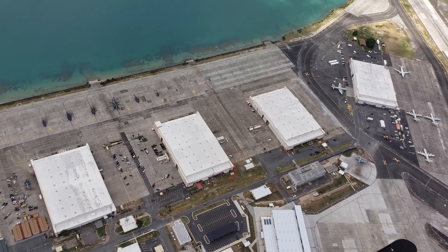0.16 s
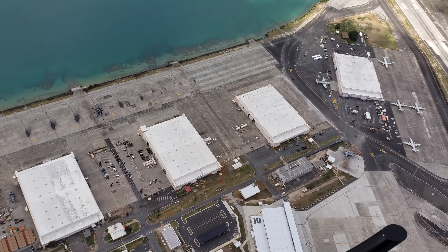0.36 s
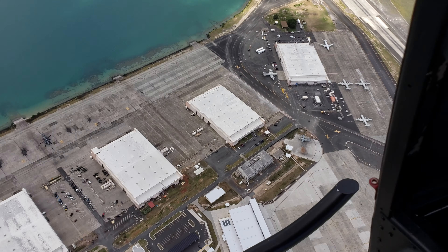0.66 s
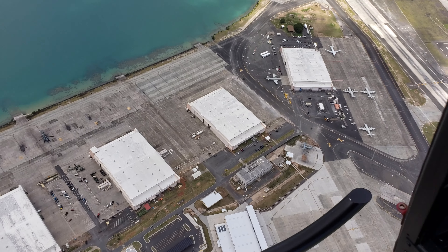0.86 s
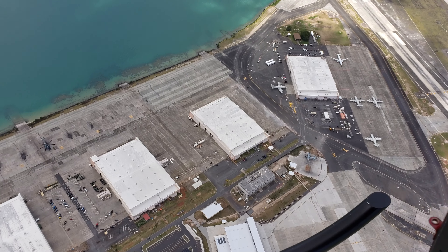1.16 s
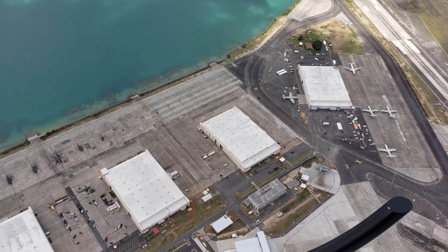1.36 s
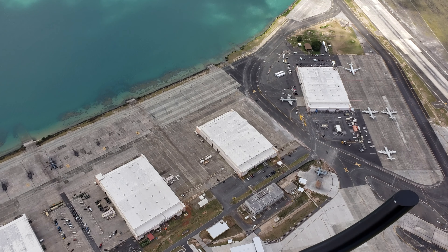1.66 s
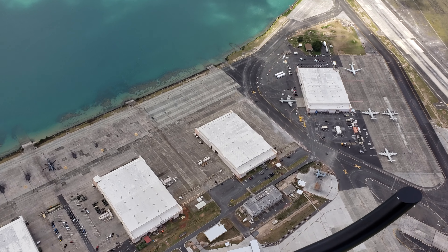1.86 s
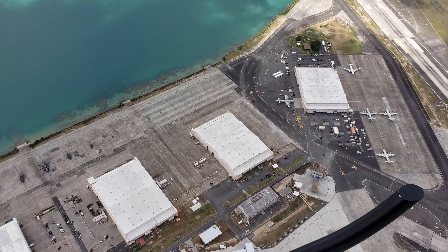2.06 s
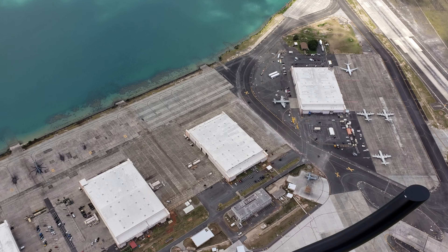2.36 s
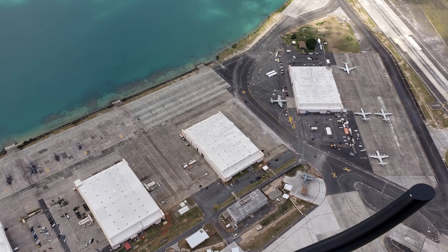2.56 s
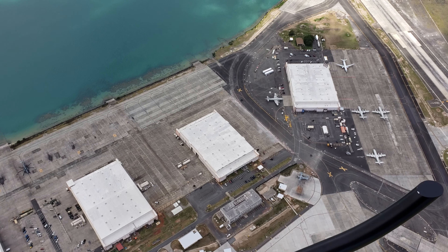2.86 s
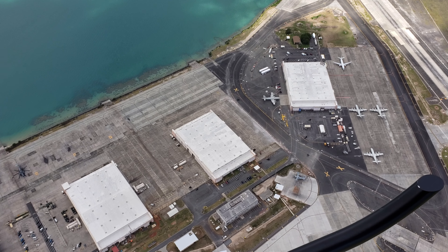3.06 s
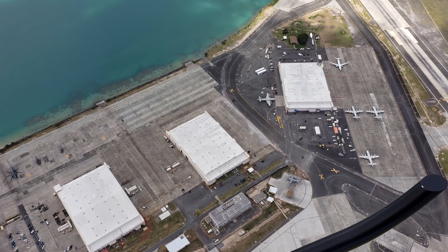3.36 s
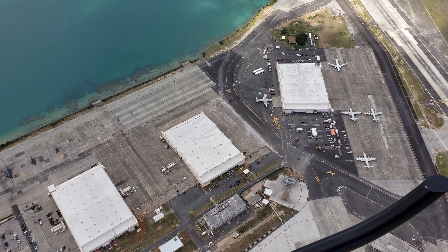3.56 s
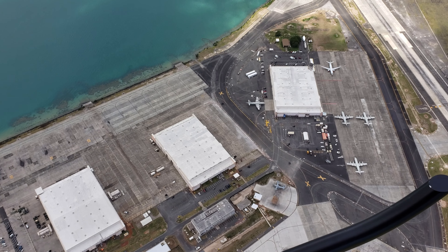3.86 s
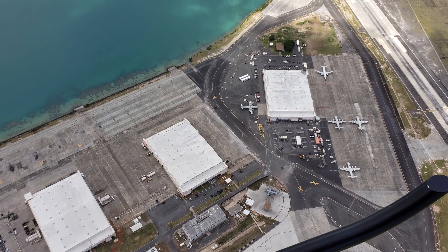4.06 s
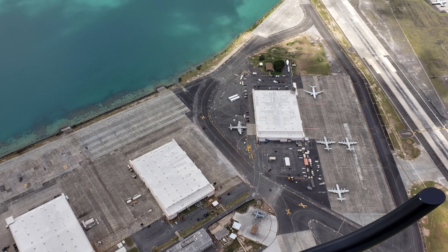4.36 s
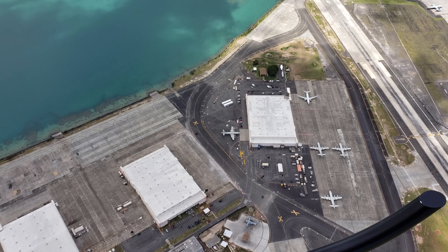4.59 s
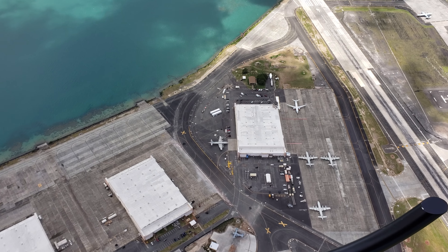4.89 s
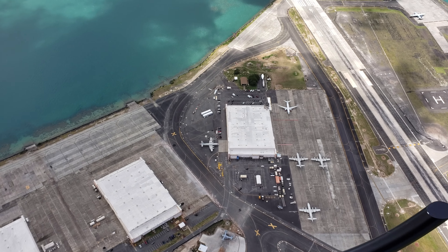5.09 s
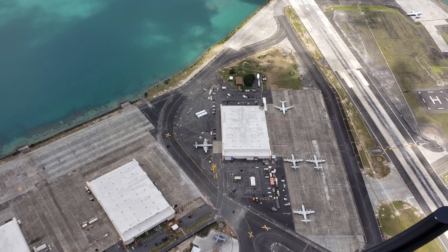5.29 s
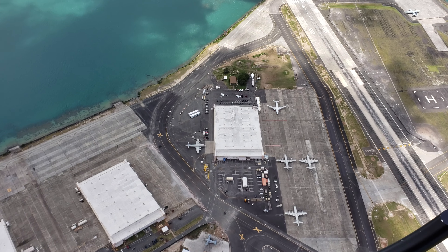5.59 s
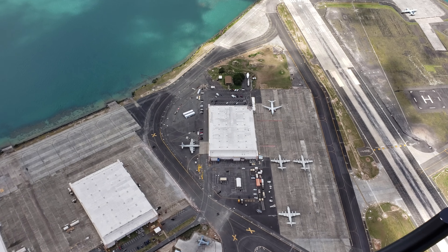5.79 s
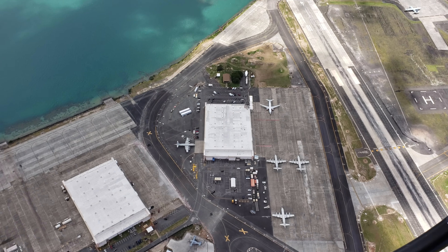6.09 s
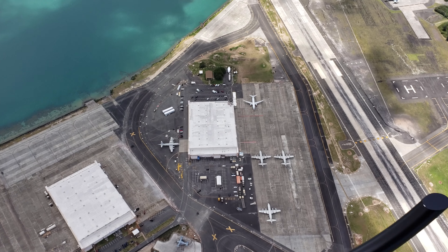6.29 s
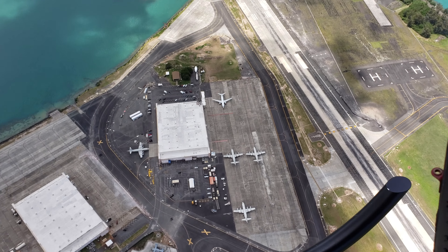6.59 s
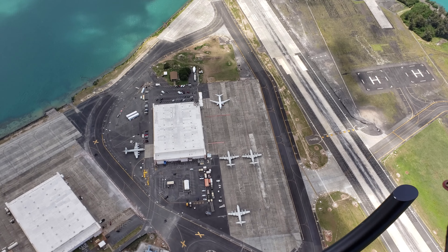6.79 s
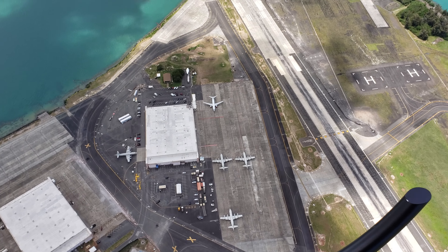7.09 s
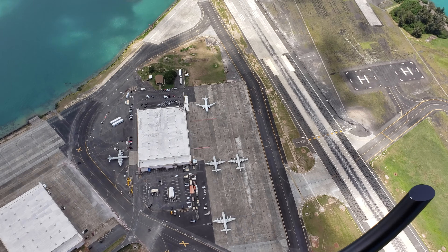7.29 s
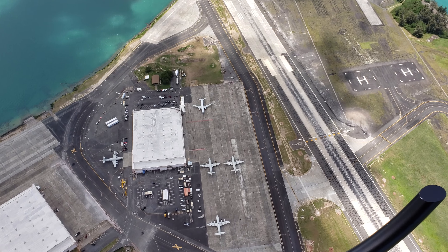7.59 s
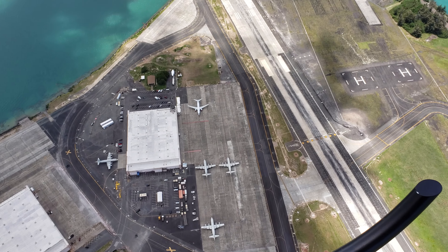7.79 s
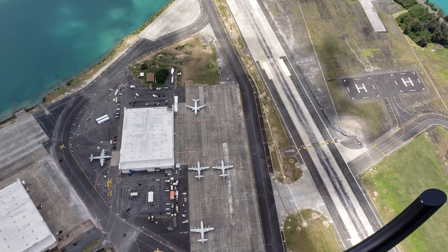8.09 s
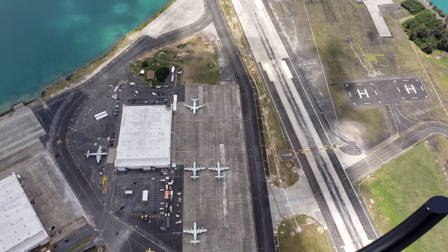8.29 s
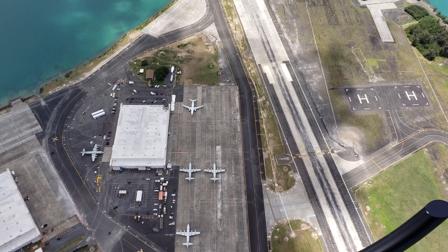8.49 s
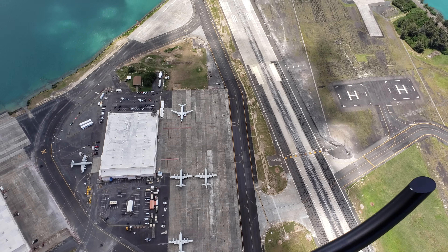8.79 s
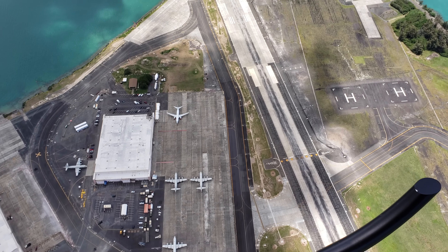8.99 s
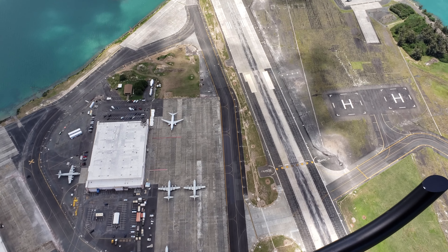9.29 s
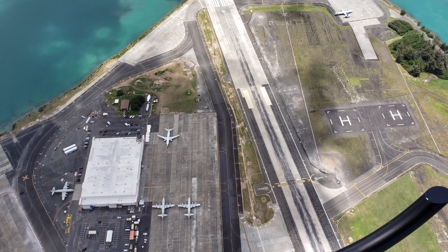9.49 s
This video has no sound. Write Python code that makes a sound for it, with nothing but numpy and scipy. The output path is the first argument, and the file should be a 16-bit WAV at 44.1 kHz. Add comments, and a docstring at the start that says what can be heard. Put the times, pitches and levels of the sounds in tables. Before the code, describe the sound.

Deep, fluttering wind pounds a microphone held by the open side of a helicopter cabin in flight, over steady engine drone and light, rapid rotor swishes. As the first blast eases, a few small dry ticks come close on the right. The wind then surges in waves, sputtering on the left, dips abruptly to leave the engine more exposed, and swells again near the end.

```python
"""Inside a two-bladed helicopter in flight, a phone held at the open side of the cabin.
From the start the slipstream buffets both microphone ports and rushes over the left one; under it
turbine and gearbox roar and each blade swishes past. The first gust dies down, and in the first two
seconds a few tiny ticks sound close on the right. The wind returns in gusts, spitting over the left
port, drops away suddenly at 6.3 s and builds again to a last gust at 8.5 s."""
import sys
import numpy as np
from scipy import signal
from scipy.fft import rfft, irfft, next_fast_len
from scipy.io import wavfile
from scipy.ndimage import uniform_filter1d, minimum_filter1d

SR = 44100
rng = np.random.default_rng(int(sys.argv[2]) if len(sys.argv) > 2 else 0)


def transcribe(signal):
    """Save signal, clipped to [-1, 1], as a 16-bit WAV file at the path in sys.argv[1]."""
    frames = np.atleast_2d(signal).T
    limited = np.clip(frames, -1, 1)
    pcm = np.round(limited * 32767).astype(np.int16)
    wavfile.write(sys.argv[1], SR, pcm)


N = 425565
TIME = np.arange(N) / SR
TURN_HZ = 6.763  # rotor turns a second

# spectra of air rushing and hissing over a port: f/Hz, relative level/dB
RUSH_SPECTRUM = [(200, -16.5), (400, 2.5), (650, 0.5), (1000, -5.5), (1600, -10.5), (2400, -17.5),
                 (3500, -25), (5000, -37), (9000, -54.5)]
HISS_SPECTRUM = [(1500, -9.5), (3000, -10.5), (4500, 2.5), (6600, 3), (7200, -1), (8000, -12), (12000, -14),
                 (15500, -20)]


def undb(db):
    """Decibels to gain."""
    return 10 ** (np.asarray(db) / 20)


def unit(x):
    """Scale to rms 1."""
    return x / np.sqrt(np.mean(x ** 2))


def curve(points):
    """Straight lines in time through (t/s, value) points."""
    return np.interp(TIME, *np.transpose(points))


def delayed(x, lag_s):
    """The same sound arriving lag_s later."""
    return np.interp(TIME - lag_s, TIME, x)


def noise(gain):
    """Noise of rms 1 whose spectrum is the function gain(Hz)."""
    size = next_fast_len(N, True)
    hz = np.maximum(np.arange(size // 2 + 1) * SR / size, 1)
    return unit(irfft(rfft(rng.standard_normal(size)) * gain(hz), size)[:N])


def coloured(spectrum):
    """Noise of rms 1 shaped by (f/Hz, level/dB) points, falling away beyond their ends."""
    f, db = np.transpose(spectrum)

    def gain(hz):
        skirts = np.minimum(hz / f[0], 1) ** 2 * np.minimum(f[-1] / hz, 1) ** 2
        return undb(np.interp(np.log(hz), np.log(f), db)) * skirts
    return noise(gain)


def resonance(centre_hz, width_hz):
    """Noise ringing in one steep-sided resonance."""
    return noise(lambda hz: 1 / (1 + .5 * ((hz - centre_hz ** 2 / hz) / width_hz) ** 2))


def walk(rate):
    """Smooth random motion of spread 1, up to about rate changes a second."""
    return noise(lambda hz: np.exp(-(hz / rate) ** 2))


def steady(x, span_s=0.12, amount=0.18):
    """Ease the slow swells of a noise, as in a sustained flow."""
    power = uniform_filter1d(x ** 2, int(span_s * SR))
    return unit(x / (power + 1e-6) ** (amount / 2))


def saturate(db, ceiling_db, knee_db=3.5):
    """A level that bends softly into a ceiling."""
    return db - knee_db * np.logaddexp(0, (db - ceiling_db) / knee_db)


def eddies(spectrum, wind_db, shared):
    """Eddies cross the left port, then the right; part of the turbulence is each port's own."""
    lag_s = np.interp(wind_db, [2, 6], [0.00056, 0.00077])  # longer as gusts run along the phone
    common = steady(coloured(spectrum))
    crossing = np.array([common, delayed(common, lag_s)])
    own = np.array([coloured(spectrum), coloured(spectrum)])
    return np.sqrt(shared) * crossing + np.sqrt(1 - shared) * own


def buffeting(wind_db, throb=0.021):
    """Eddies pound the ports, throbbing with each blade; in gusts the windward left port saturates."""
    # spectra of the large and the small eddies: f/Hz, relative level/dB
    deep_spectrum = [(20, -29), (32, -20.5), (50, -6), (70, 0.5), (100, 2.5), (135, -5.5), (190, -31),
                     (400, -45.5)]
    flutter_spectrum = [(90, -10), (145, 0.5), (200, 0.5), (240, -3), (275, -6.5), (320, -5), (400, -15),
                        (550, -24), (750, -32.5), (1100, -55), (2500, -75.5)]
    # the wind swings between the ports: t/s, level towards the left/dB
    bearing = [(0, 0), (0.8, -3.5), (1.4, 1.5), (2.7, 2.7), (4.9, 0.5), (5.4, -0.8), (6.2, -3), (8.2, 0.5),
               (9.65, 1.5)]
    deep_db = [saturate(-21 + 0.89 * wind_db, ceiling_db=-18.5), -26.5 + 1.17 * wind_db]
    flutter_db = [saturate(-19 + 1.4 * wind_db, ceiling_db=-14.5), -25.5 + 0.97 * wind_db]
    large = eddies(deep_spectrum, wind_db, shared=0.92) * undb(deep_db)
    small = eddies(flutter_spectrum, wind_db, shared=0.87) * undb(flutter_db)
    bearing_db = curve(bearing)
    balance = undb([bearing_db / 2, -bearing_db / 2])
    blade_pulse = 1 + throb * np.cos(2 * np.pi * 2 * TURN_HZ * TIME)
    return (large + small) * balance * blade_pulse


def grazing(wind_db, lee_rush_db=-15, lee_hiss_db=-24, flicker_db=2.0, sputter_db=2.5, crackle_db=4):
    """Air tears unevenly over the rim of the left port; the right port lies in the lee."""
    flow_db = wind_db + .5 * walk(12)
    turbulence = unit(walk(240) + 0.55 * walk(60))
    crackle = np.tanh(np.maximum(turbulence - 2, 0))  # only the strongest surges crackle
    rush = eddies(RUSH_SPECTRUM, wind_db, shared=0.41) * undb([[0], [lee_rush_db]])
    hiss = np.array([coloured(HISS_SPECTRUM), undb(lee_hiss_db) * coloured(HISS_SPECTRUM)])
    rush_db = -39 + 1.416 * flow_db + flicker_db * turbulence
    hiss_db = -61.5 + 1.54 * flow_db + sputter_db * turbulence + crackle_db * crackle
    return rush * undb(rush_db) + hiss * undb(hiss_db)


def cabin(left_db=-37, right_db=-42, waver_db=1.0):
    """The broad roar of turbine and gearbox, ringing in the airframe, over the drone of the cabin air."""
    # spectrum of the roar at each port: f/Hz, relative level left/dB, right/dB
    roar_spectra = [(276, 0.5, 0.5), (566, -7.5, -12.5), (940, -12, -29.5), (1340, -17.5, -33),
                    (2170, -17.5, -27.5), (3130, -25, -39.5), (4270, -37, -40.5), (5200, -38.5, -50.5),
                    (7060, -37, -46), (7850, -47, -49.5), (8700, -48.5, -42), (10500, -46, -47),
                    (12300, -50.5, -44.5), (15500, -46, -49)]
    # airframe resonances: f/Hz, width/Hz, level left/dB, right/dB
    airframe_modes = [(1150, 77, -62, -75.5), (1714, 110, -60.5, -81.5), (2430, 84, -66, -78),
                      (4460, 380, -68, -83.5)]
    # cabin air resonances driven by engine and rotors: f/Hz, width/Hz, level/dB
    air_modes = [(97, 28, -34), (189, 25, -38)]
    hz, left, right = np.transpose(roar_spectra)
    roar = np.array([undb(left_db) * coloured(np.c_[hz, left]),
                     undb(right_db) * coloured(np.c_[hz, right])])
    rings = sum(undb([[l_db], [r_db]]) * resonance(f, width) for f, width, l_db, r_db in airframe_modes)
    drone = sum(undb(db) * resonance(f, width) for f, width, db in air_modes)
    drone_at_ports = np.array([drone, 1.14 * delayed(drone, lag_s=0.00059)])
    return (roar + rings) * undb(waver_db * walk(32)) + drone_at_ports


def rotor(scatter_db=1.2):
    """The two blades swish in turn, each with its own whistle that falls as the blade sweeps past."""
    # bands of the swishes: blade, length/turns, f/Hz, width/Hz, fall/(octaves per turn),
    # level left/dB, right/dB
    swishes = [("first", .058, 3980, 950, 2, -54.5, -63.5), ("first", .045, 2450, 410, 1.5, -52.5, -63.5),
               ("first", .055, 7700, 1700, 0.77, -63, -75), ("second", .055, 7700, 2000, 1.1, -62, -74),
               ("first", .07, 8900, 1100, .3, -81, -73.5), ("second", .065, 8900, 1100, .3, -73.5, -69.5),
               ("first", .08, 13000, 4500, 0, -87.5, -73.5), ("second", .08, 13000, 4500, 0, -80.5, -72)]
    # where each blade passes the cabin: blade, phase/turns
    passing_phase = {"first": .316, "second": .83}
    out = np.zeros((2, N))
    strength = undb(scatter_db * walk(10))
    for blade, length, hz, width, fall, left_db, right_db in swishes:
        turns_past = (TURN_HZ * TIME - passing_phase[blade] + .5) % 1 - .5
        whistle = np.cos(2 * np.pi * hz * np.cumsum(2 ** (-fall * turns_past)) / SR)
        swell = np.exp(-.5 * (turns_past / length) ** 2) * strength
        for channel, db in enumerate((left_db, right_db)):
            out[channel] += undb(db) * swell * unit(walk(width * .7) * whistle)
    return out


def ticks(decay_s=.0006, left_db=-18, low_hz=3500):
    """Dry, bright ticks close to the right port."""
    # each tick on the right: t/s, peak level/dB
    tick_peaks = [(0.0394, -27), (0.62, -42), (0.7715, -37), (0.8824, -43), (1.4122, -43), (1.5854, -54.5),
                  (1.6343, -35)]
    out = np.zeros(N)
    age = np.arange(SR // 100) / SR
    high_pass = signal.butter(1, low_hz, "high", fs=SR)
    for s, db in tick_peaks:
        tick = signal.lfilter(*high_pass, rng.standard_normal(len(age)) * np.exp(-age / decay_s))
        start = int(s * SR)
        out[start:start + len(age)] += undb(db) * tick / np.abs(tick).max()
    return np.array([undb(left_db) * out, out])


def spurts(gain_db=1, length_s=0.00078, hiss_db=-15, lee_db=-16):
    """Single hard spurts of air spit across the left port."""
    # each spurt: t/s, relative level/dB
    hits = [(0.204, -30), (2.624, -27), (2.936, -32), (5.342, -31), (5.622, -27.5), (5.71, -27),
            (5.815, -31), (8.208, -43), (8.517, -26), (8.539, -28)]
    bursts = sum(undb(db + gain_db) * np.exp(-.5 * ((TIME - s) / length_s - 1) ** 2) for s, db in hits)
    air = coloured(RUSH_SPECTRUM) + undb(hiss_db) * coloured(HISS_SPECTRUM)
    return bursts * air * undb([[0], [lee_db]])


def scene():
    """Wind right on the microphone, with the machine behind it."""
    # slipstream at the phone: t/s, level over its usual strength/dB
    slipstream = [(0, 12), (0.17, 7.5), (0.26, 1.5), (0.62, -8), (1.1, -5.5), (1.56, -3.5), (1.79, 0.7),
                  (2.05, -2.5), (2.41, -1), (2.68, 6), (3.2, 1.5), (3.55, 3.5), (3.87, 7), (4.16, 6),
                  (4.3, 0.2), (4.97, 0.5), (5.36, 8.5), (5.88, 5.5), (6.12, 9.5), (6.3, 3.5), (6.36, -7.5),
                  (7.32, -8), (7.74, -2.5), (8.0, -5), (8.55, 6.5), (8.76, -2.5), (9.65, 0.5)]
    # how openly cabin noise and rotor reach the phone: t/s, gain/dB
    exposure = [(0, 0.5), (1.4, -2), (2.2, 0), (3, 2.5), (4.1, 1), (4.6, 1.5), (6.1, -3), (6.5, -1.5),
                (7.4, -1.5), (8.2, 0.5), (9, 3), (9.65, 1)]
    wind_db = curve(slipstream)
    wind = buffeting(wind_db) + grazing(wind_db) + spurts()
    machine = (cabin() + rotor()) * undb(curve(exposure))
    return wind + machine + ticks()


def record(dry, ceiling=1.0, hold_s=0.014, top_hz=15700):
    """The phone's limiter ducks any buffet above its ceiling; the top treble is cut."""
    hold = int(hold_s * SR)
    allowed = np.minimum(1, ceiling / (np.abs(dry).max(axis=0) + 1e-9))
    gain = uniform_filter1d(minimum_filter1d(allowed, hold), hold)
    low_pass = signal.ellip(10, .1, 50, top_hz, fs=SR, output="sos")
    return signal.sosfiltfilt(low_pass, dry * gain)


dry = scene()
out = record(dry)
transcribe(out)
```